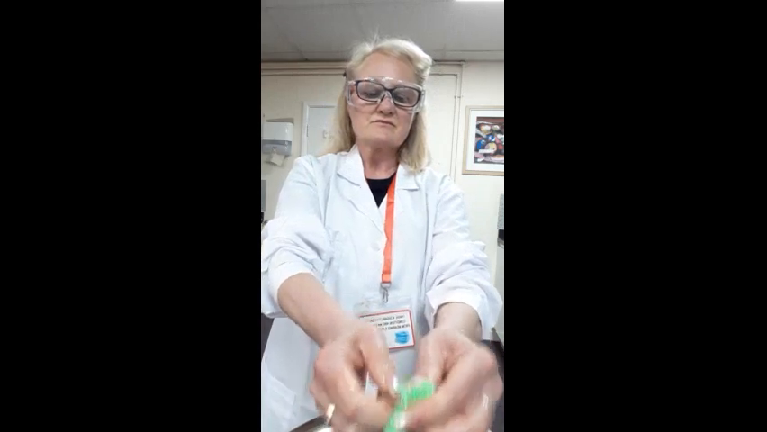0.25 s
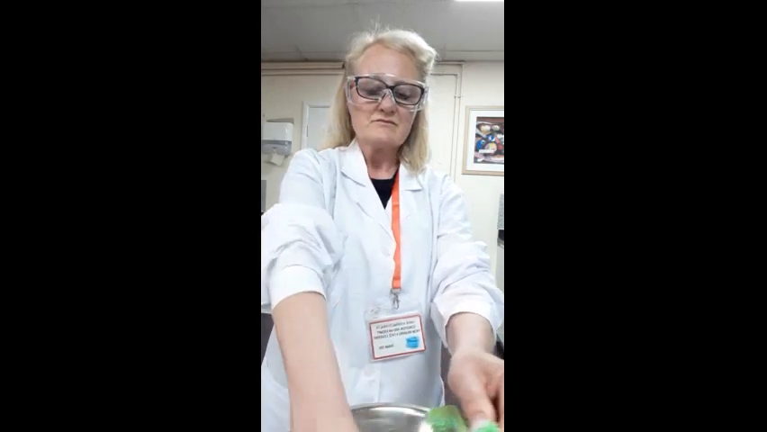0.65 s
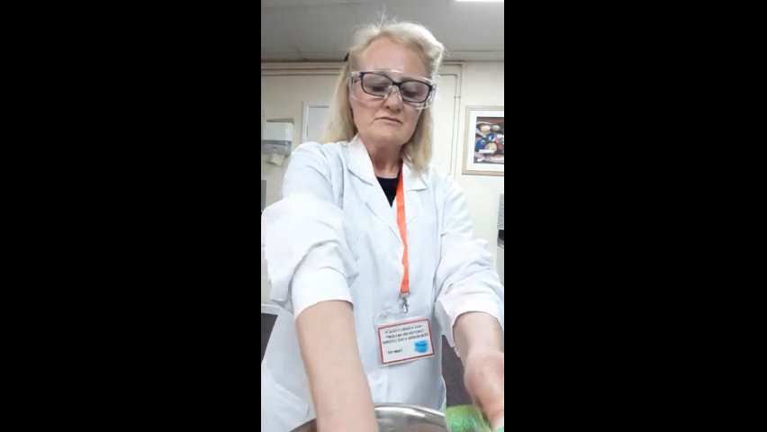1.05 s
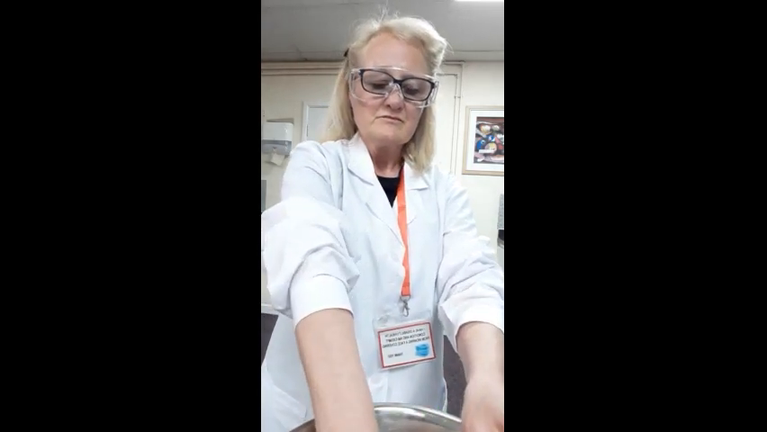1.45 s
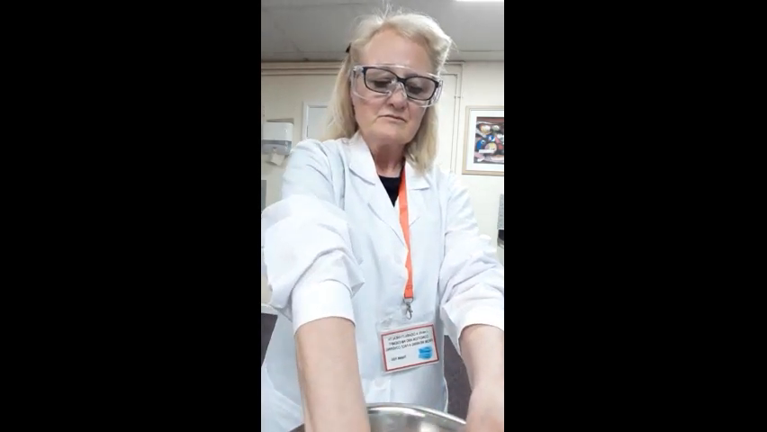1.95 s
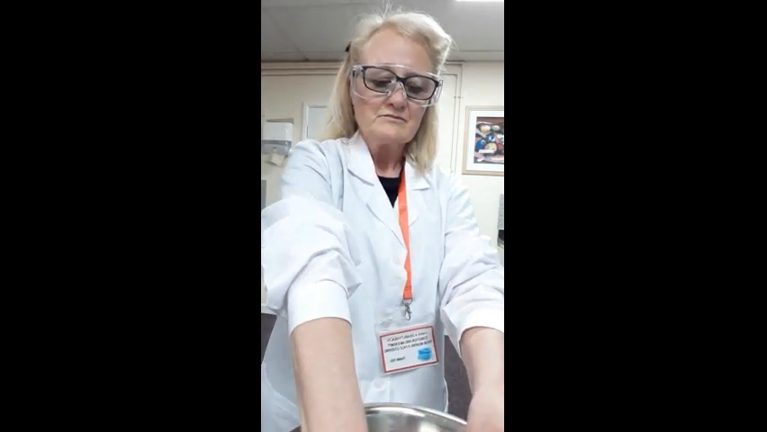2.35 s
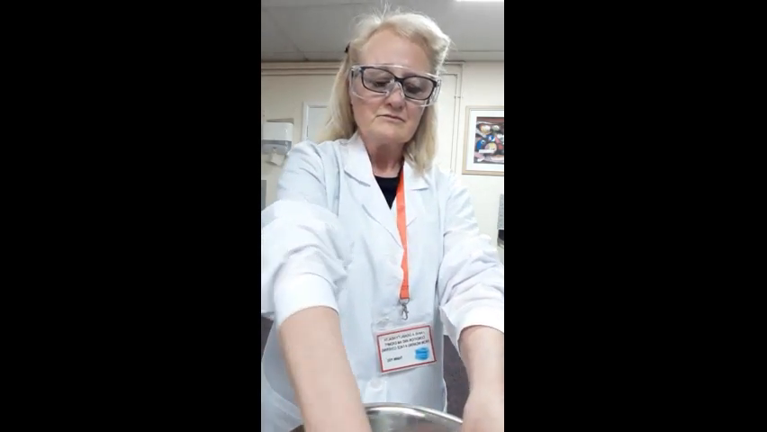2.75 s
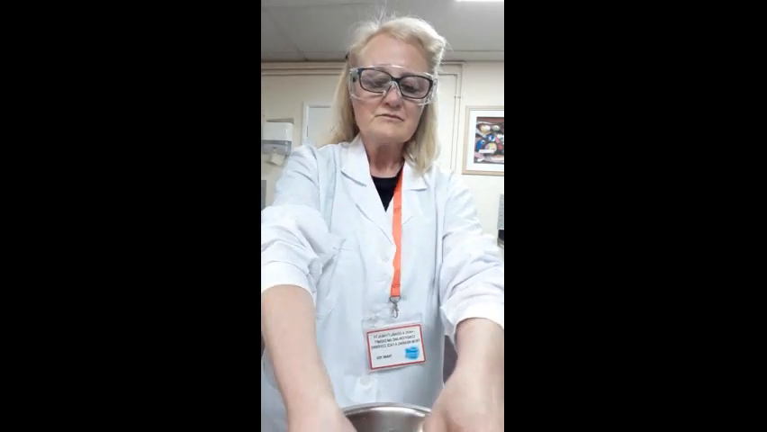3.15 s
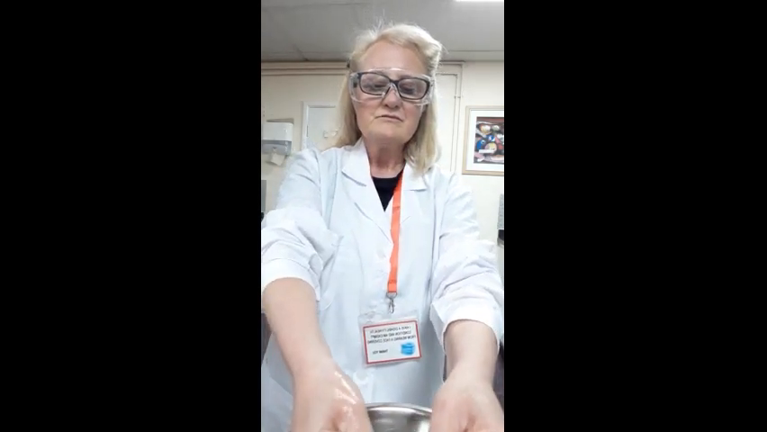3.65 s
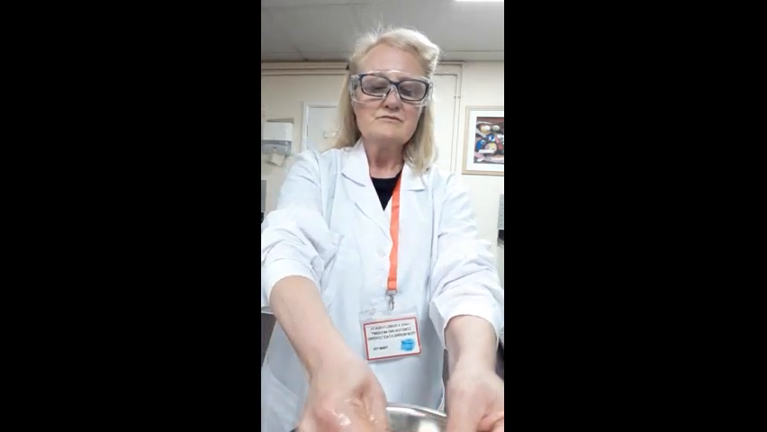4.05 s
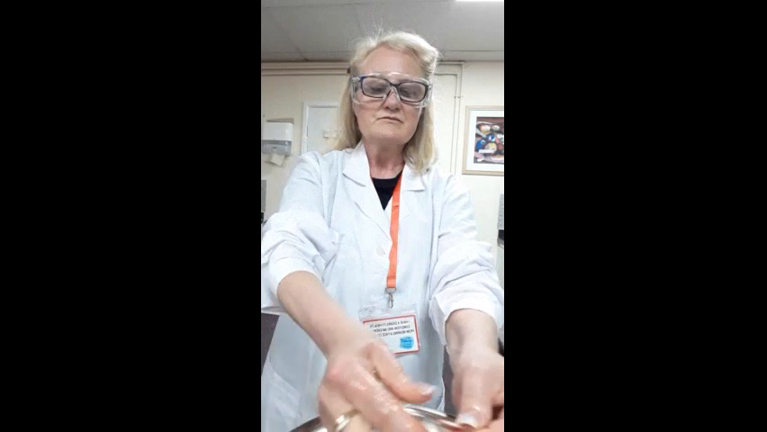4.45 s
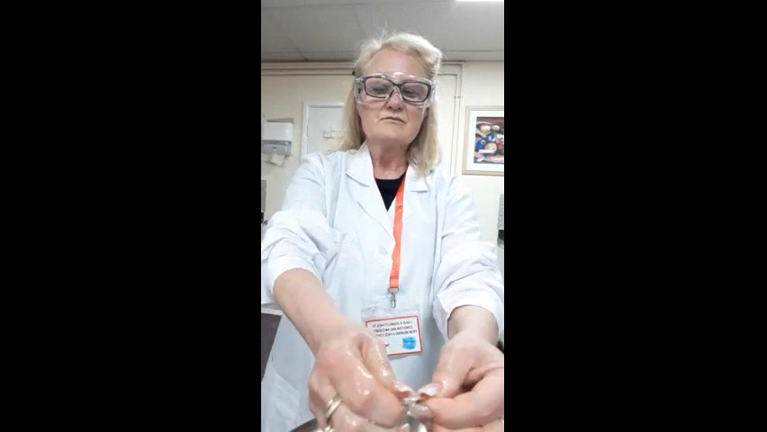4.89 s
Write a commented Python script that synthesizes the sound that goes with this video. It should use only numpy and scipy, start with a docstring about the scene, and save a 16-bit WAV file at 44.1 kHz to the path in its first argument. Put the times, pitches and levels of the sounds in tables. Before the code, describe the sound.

Wet pad scrubs a coin in faint hissing strokes, then metal clinks, squeaks and drips ring in a steel bowl that scrapes along the bench.

```python
"""Wet fingers scrub a coin with a scouring pad: a crackling hiss in short strokes, with bright soap snaps.
Then coin and rings clink in a steel bowl of water: noisy contacts ring its modes. The coin skids and squeaks
while the bowl rocks on its foot with low knocks; drips and clicks are damped tones. Next the bowl is dragged
over the bench in juddering shoves; more drips and snaps follow, then two faint shoves.
A quiet small room, steady noise with a fading hum, lies under it all, heard by a phone close by."""
import sys
import numpy as np
from scipy import signal
from scipy.fft import rfft, irfft
from scipy.io import wavfile
from scipy.ndimage import uniform_filter1d

SR = 44100
rng = np.random.default_rng(int(sys.argv[2]) if len(sys.argv) > 2 else 0)


def unload_audio(sound):
    """Save the sound as a 16-bit wav file, at the path given as the first command line argument."""
    columns = np.transpose(np.atleast_2d(sound))
    # keep every value between -1 and 1, then stretch to whole-number steps
    steps = np.round(np.clip(columns, -1, 1) * 32767)
    wavfile.write(sys.argv[1], SR, steps.astype(np.int16))


N = 225880
SPAN = 2 ** 15  # samples in one short sound
T = np.arange(SPAN) / SR  # seconds
HZ = np.arange(SPAN // 2 + 1) * SR / SPAN + 1e-3


def undb(db):
    """Decibels to gain."""
    return 10 ** (np.asarray(db) / 20)


def unit(x):
    """Scale to rms 1."""
    return x / np.sqrt(np.mean(x ** 2))


def causal(db):
    """Minimum-phase response for a gain in dB on the HZ grid, by folding the cepstrum."""
    cepstrum = irfft(db * np.log(10) / 20)
    cepstrum[1:SPAN // 2] *= 2
    cepstrum[SPAN // 2 + 1:] = 0
    return np.exp(rfft(cepstrum))


def shape(points):
    """dB on the HZ grid from (Hz, dB) points, straight over log frequency."""
    hz, db = np.transpose(points)[:2]
    return np.interp(np.log(HZ), np.log(hz), db)


def octaves_above(hz, most):
    """Octaves above hz on the HZ grid, from 0 up to most."""
    return np.clip(np.log2(HZ / hz), 0, most)


def octaves_below(hz, most):
    """Octaves below hz on the HZ grid, from 0 up to most."""
    return np.clip(np.log2(hz / HZ), 0, most)


def colour(x, db):
    """Filter a long signal."""
    return signal.oaconvolve(x, irfft(causal(db))[:SPAN // 8])[:N]


def resonate(x, modes):
    """Sum of narrow resonances (Hz, width Hz, dB), each at its own rms level."""
    total = 0
    for hz, width_hz, db in modes:
        b, a = signal.iirpeak(hz, hz / width_hz, SR)
        total = total + undb(db) * unit(signal.lfilter(b, a, x))
    return total


def curves(tables):
    """Gain from level tables at every sample, lightly smoothed; silent outside them."""
    t = np.arange(N) / SR
    gain = np.zeros(N)
    for rows in tables:
        s, db = np.transpose(rows)
        inside = (t >= s[0]) & (t <= s[-1])
        gain[inside] = undb(np.interp(t[inside], s, db))
    return uniform_filter1d(gain, size=200)


def add(out, s, sound, peak_db):
    """Mix one sound in at time s with the given peak."""
    i = int(s * SR)
    scaled = sound * undb(peak_db) / np.abs(sound).max()
    out[i:i + SPAN] += scaled[:N - i]


def burst(ms):
    """Spectrum of a rough contact: random signs that build up quickly and fade with time constant ms."""
    age = T * 1000 / max(ms, .05)
    noise = np.sign(rng.standard_normal(SPAN)) * np.exp(-age)
    rise = 1 - np.exp(-(T + 1 / SR) * 1000 / (0.22 * ms))
    return rfft(unit(noise * rise))


def slips(per_s, spread_db, smooth):
    """Stick-slip: random jerks of uneven size over a smooth rub."""
    chance = rng.random((3, N))
    size_db = spread_db * np.minimum(-np.log(1 - chance[2]), 4.0)
    jerks = (chance[0] < per_s / SR) * np.sign(chance[1] - .5) * undb(size_db)
    return unit(unit(jerks) + smooth * rng.standard_normal(N))


def flutter(per_s, depth_db):
    """Quick random wobble of pressure, as a gain."""
    k = int(SR / per_s)
    steps = np.repeat(rng.standard_normal(N // k + 1), k)[:N]
    return undb(depth_db * uniform_filter1d(steps, k))


# Modes of the steel bowl. Each row: frequency in Hz, relative level in dB, t60 in seconds.
BOWL_MODES = [(767, -19, 0.24), (1104, -13.5, 0.21), (1171, -18, 0.49), (1213, -19, 0.52),
              (1248, -22.5, 0.84), (1291, -16.5, .65), (1615, -14.5, 0.057), (1588, -9.5, 0.28),
              (1702, -7.5, 0.066), (1975, -8.5, 0.2), (2004, -12, 0.17), (2329, -6, 0.11),
              (2370, -17.5, 0.3), (2426, -16, 0.22), (2760, -8, 0.21), (2860, -18, .28), (3170, -25, 0.3),
              (3170, -22, 0.58), (3400, -18.5, 0.25), (3467, -8, 0.11), (4400, -30, 0.55),
              (4100, -14.5, 0.21), (4400, -21, 0.26), (5130, -26.5, 0.17), (5350, -27.5, .17),
              (5950, -25, 0.058), (6470, -9.5, 0.1), (6800, -5, 0.11), (7250, -15, 0.12)]


def bowl_rings(rows):
    """Spectra of decaying sines, a row for each mode; moving water makes each waver."""
    hz, db, t60_s = (column[:, None] for column in np.transpose(rows))
    line_width_hz = 3.4
    steps = rng.standard_normal((len(rows), SPAN))
    waver = np.cumsum(steps, axis=1) * np.sqrt(2 * np.pi * line_width_hz / SR)
    sines = np.sin(2 * np.pi * hz * T + waver)
    return rfft(undb(db) * sines * 1000. ** (-T / t60_s), axis=1)


# Crowd of close upper modes and the room. Each row: band centre in Hz, relative level in dB, t60 in seconds.
TAIL_BANDS = [(420, -13, 0.33), (816, -14, 0.18), (1520, -10.5, 0.067), (3100, -13.5, 0.21),
              (6340, -17.5, 0.15), (12000, -21, 0.067)]


def tails(count):
    """Spectra of noises in bands that die away, each band at its own rate."""
    noise = rfft(rng.standard_normal((count, SPAN)))
    total = 0
    for hz, db, t60_s in TAIL_BANDS:
        band = np.exp(-(np.log2(HZ / hz) / 0.67) ** 2)
        total = total + undb(db) * irfft(band * noise) * 1000. ** (-T / t60_s)
    return rfft(total)


def steel(modes, tail, ring_db, spot_db=3.5):
    """What rings on after a touch at a random spot of the bowl: its modes and the noisy tail."""
    levels = undb(spot_db * rng.standard_normal(len(modes)))
    spot = levels * np.exp(2j * np.pi * rng.random(len(modes)))
    slosh_bins = int(6.0 * rng.standard_normal())  # moving water detunes the steel by a few Hz
    return undb(ring_db) * np.roll(spot @ modes, slosh_bins) + tail


# Air noise spectrum. Each row: frequency in Hz, relative level in dB per Hz.
AIR_SPECTRUM = [(15, -48), (25, -16.5), (108, 1), (280, -19.5), (669, -24), (787, -26.5), (952, -32),
                (1090, -24), (1730, -25.5), (5880, -29.5), (6920, -30), (15200, -29), (16500, -38.5)]
AIR_DB = -66
# Faint far hum. One row: frequency in Hz, width in Hz, starting level in dB, seconds until its gain halves.
FAR_HUM = (341.5, 7.5, -79.5, 4.5)


def room():
    """Steady air noise and a narrow band of noise, the hum, that fades."""
    hz, width_hz, db, half_s = FAR_HUM
    hum = resonate(rng.standard_normal(N), [(hz, width_hz, db)])
    fade = 1 / (1 + (np.arange(N) / SR / half_s) ** 4)
    air = unit(colour(rng.standard_normal(N), shape(AIR_SPECTRUM)))
    return undb(AIR_DB) * air + fade * hum


# Drips, short clicks, a low thud and held tones. Each row: start in seconds, peak in dB,
# starting pitch in Hz, length in cycles.
DAMPED_TONES = [(.664, -50.5, 1906, 40), (.845, -38, 410, 22), (.865, -41, 600, 18),
                (1.060, -28.5, 2050, 0.93), (1.107, -46, 5000, 5.8), (1.128, -31.5, 1950, 1.15),
                (1.16, -47, 2860, 4.3), (1.800, -41.5, 620, 5), (1.806, -15, 5300, 0.46),
                (1.902, -31.5, 790, 5.7), (1.976, -21.5, 4200, 3.4), (2.017, -30.5, 2700, 3.3),
                (2.056, -38, 4800, 6.3), (2.113, -40, 1150, 0.93), (2.113, -33, 4150, 1.7),
                (2.128, -23.5, 1160, 3.8), (2.136, -26.5, 834, 2.1), (2.137, -21, 5900, 2.4),
                (2.165, -34.5, 1537, 18), (2.177, -24.5, 1270, 1.36), (2.189, -28.5, 1980, 5.6),
                (2.207, -34, 2360, 3.7), (2.254, -41, 1955, 4), (2.282, -27.5, 1464, 13),
                (2.284, -32, 3080, 17), (2.357, -29, 1180, 7.1), (2.371, -37, 5280, 2.2),
                (2.373, -32, 1205, 1.7), (2.379, -19, 4200, 2.7), (2.600, -31.5, 2220, 2.9),
                (2.747, -13, 2160, 2.3), (2.750, -15, 2760, 3.4), (2.751, -22.5, 1230, 7.3),
                (2.781, -29, 4500, 2.2), (3.184, -23.5, 3050, 12), (3.230, -29, 4370, 18),
                (3.395, -44, 2380, 48), (3.587, -34, 4030, 25), (3.659, -42, 3430, 8.4),
                (3.818, -46.5, 3390, 24), (3.857, -35, 3190, 17), (3.860, -46, 2330, 24),
                (3.888, -37, 2377, 11.3), (3.991, -52.5, 3490, 13), (3.993, -59, 2420, 15),
                (4.028, -38, 3020, 8.7), (4.078, -43.5, 3300, 21), (4.080, -56.5, 2020, 10),
                (4.143, -60.5, 2390, 15), (4.196, -42, 5150, 4.7), (4.197, -56.5, 2464, 9.9),
                (4.233, -39.5, 6800, 17)]
TONE_RING_DB, TONE_RING_PER_DB = -14.5, -.5  # at a peak of -36.5 dB; fainter ones carry more bowl and room


def drips_and_clicks(modes, tail):
    """Damped tones, each gliding slightly upward with a trembling level and stirring the bowl."""
    out = np.zeros(N)
    for k, (s, peak_db, hz, cycles) in enumerate(DAMPED_TONES):
        age = T * hz / cycles
        glide = np.sin(2 * np.pi * hz * T * (1 + 0.04 * np.minimum(age, 3)))
        tone = glide * np.exp(-age * 2.2) * (1 - np.exp(-age * 4.5))
        tremble = unit(uniform_filter1d(rng.standard_normal(SPAN), size=40))
        tone = tone * (1 + .4 * tremble)
        ring_db = TONE_RING_DB + TONE_RING_PER_DB * (peak_db + 36.5)
        ring = undb(ring_db) * steel(modes, tail[k % len(tail)], ring_db=-23.5)
        fade = undb(-150 * T)
        add(out, s, irfft(rfft(tone) * (1 + ring)) * fade, peak_db)
    return out


# Soap film and wet skin snapping. Each row: start in seconds, peak in dB, centre in Hz.
SNAP_EVENTS = [(0.0258, -25, 11400), (0.0546, -44, 7000), (0.2236, -31, 7220), (0.2458, -23, 5700),
               (0.266, -46, 6770), (0.3002, -23.5, 7300), (0.3444, -25, 11200), (0.4493, -38, 8560),
               (0.4787, -45, 7240), (0.634, -44.5, 12600), (0.6963, -42.5, 7680), (0.713, -40, 6520),
               (2.129, -30, 8330), (2.136, -28.5, 8430), (2.388, -37, 8400), (2.578, -40.5, 7460),
               (2.8015, -30, 6600), (3.2269, -31, 6650), (3.3892, -30.5, 8900), (3.5845, -44, 6400),
               (3.701, -49.5, 6700), (3.7763, -41.5, 8480), (3.8132, -29, 11630), (3.856, -37.5, 12700),
               (3.8861, -43.5, 12900), (4.018, -35, 12500), (4.0771, -45, 8170), (4.142, -36, 12820),
               (4.2334, -20.5, 11260), (4.4503, -39.5, 11440), (4.8497, -45, 12800), (4.8923, -45.5, 13100)]
SNAP_TAIL_DB = -10


def snaps(tail):
    """Soap snaps are bright ticks: a very short burst in one band, with a noisy tail."""
    out = np.zeros(N)
    for k, (s, peak_db, hz) in enumerate(SNAP_EVENTS):
        tick = causal(np.maximum(-16 * np.log2(HZ / hz) ** 2, -60))
        ring = 1 + undb(SNAP_TAIL_DB) * tail[k % len(tail)]
        add(out, s, irfft(burst(0.282) * tick * ring), peak_db)
    return out


# Modes of the full bowl on its foot. Each row: frequency in Hz, relative level in dB, t60 in seconds.
FOOT_MODES = [(124, -9, .25), (158.6, -16, 0.38), (201, -2, 0.96), (322.8, -6.5, 0.057), (444, -5, 0.16),
              (496, -9, 0.15), (500, -5, 0.05), (618, -10, 0.56), (735, 1, 0.29)]
# Rocks of the bowl. Each row: time in seconds, peak in dB, rise time of the push in ms.
ROCK_EVENTS = [(0.853, -41, 33), (0.899, -36, 2.8), (1.069, -46.5, 24), (1.288, -53.5, 13),
               (1.356, -52.5, 15.4), (1.471, -44, 8.9), (1.564, -25, 22), (1.672, -41, 13),
               (1.844, -27, 14), (1.927, -37.5, 8.2), (2.149, -48, 32), (2.219, -49.5, 12), (2.454, -29, 8)]
ROCK_KNOCK_DB, ROCK_RING_DB = -4, -43.5


def rocking():
    """The base swings ever faster as it settles; the swing and a dull knock ring the heavy low modes."""
    out = np.zeros(N)
    foot = bowl_rings(FOOT_MODES).sum(axis=0)
    swing_hz = 165 - 75 * np.exp(-T / 0.016)
    swing = np.sin(2 * np.pi * np.cumsum(swing_hz) / SR)
    soft = 1 / (1 + 1j * HZ / 500) ** 3 * (1j * HZ / (85 + 1j * HZ)) ** 3  # 85 to 500 Hz
    for s, peak_db, ms in ROCK_EVENTS:
        push = swing * (T * 1000 / ms) * np.exp(-T * 1000 / ms)
        knock = rng.standard_normal(SPAN) * np.exp(-T / 0.027)
        hit = rfft(push + undb(ROCK_KNOCK_DB) * knock)
        ring = 1 + undb(ROCK_RING_DB) * foot
        add(out, s - .008, irfft(hit * soft * ring), peak_db)  # starts 8 ms early
    return out


# Shoves of the bowl over the bench, a table for each. Each row: time in seconds, relative level in dB.
SHOVES = [
    [(2.705, -75.5), (2.728, -29.5), (2.742, -44), (2.785, -42)],
    [(2.785, -39), (2.808, -24.5), (2.884, -22.5), (2.96, -27.5), (3.08, -32.5), (3.1, -28), (3.304, -31.5),
     (3.366, -55), (3.405, -60)],
    [(3.405, -53.5), (3.442, -36), (3.568, -39), (3.64, -55.5), (3.75, -85)],
    [(4.43, -87.5), (4.486, -55), (4.54, -47), (4.605, -57.5), (4.645, -45.5), (4.75, -79.5)],
    [(4.75, -79.5), (4.805, -62.5), (4.82, -52.5), (4.9, -80.5)],
]
# Bench rumble spectrum. Each row: frequency in Hz, relative level in dB per Hz.
BENCH_SPECTRUM = [(41, -79.5), (70, -18.5), (162, 5), (328, 6), (517, 9.5), (566, 8.5), (779, 11.5),
                  (1610, -11), (2220, -21.5), (2720, -22), (3820, -30), (6020, -40.5), (16000, -90)]
# Bench top resonances. Each row: frequency in Hz, width in Hz, relative level in dB.
PLANK_MODES = [(255.2, 20, -24.5), (378, 13.5, -15.5), (512, 10, -27.5), (764, 42.7, -25),
               (931, 9.3, -15.5), (1300, 31, -21)]
# Singing rim resonances. Each row: frequency in Hz, width in Hz, relative level in dB.
RIM_MODES = [(2650, 25, -19.5), (6126, 530, -22), (13020, 200, -39)]
# The foot catches and lets go. Each row: start in seconds, peak in dB, fade time constant in ms.
CATCH_EVENTS = [(2.722, -26, 4.7), (2.811, -18.5, 12), (2.832, -18.5, 5.6), (2.862, -13, 6.5),
                (2.874, -17.5, 11), (2.911, -21, 7.3), (2.928, -10, 1.6), (3.032, -21, 21),
                (3.088, -14.5, 5.8), (3.1, -22, 14), (3.136, -11, 2.2), (3.219, -15.5, 7.2),
                (3.249, -19, 19), (3.51, -33.5, 2.6), (3.549, -31.5, 6.4), (4.616, -36.5, 6),
                (4.816, -42, 3.2)]
BRIGHT_DB, BRIGHT_PER_DB, DULLEST_DB = 9.5, .9, -23  # treble gain at a -30 dB shove; harder is brighter
LIGHT_DB, BASS_PER_DB = -44.5, 5  # a shove that peaks under this level loses bass
CATCH_DULL_PER_DB = 0.37  # treble loss in dB per octave for each dB of peak under -19.5


def dragging(tail):
    """The foot judders over the bench: a grainy rumble, a few hard catches, a singing rim."""
    gain = np.abs(curves(SHOVES))  # abs guards the powers below from rounding under zero
    tilt_db = np.maximum(BRIGHT_DB + BRIGHT_PER_DB * (20 * np.log10(gain + 1e-9) + 30), DULLEST_DB)
    jerks = slips(2000, 3.0, 0.71) * flutter(45, 3.2)
    bench = shape(BENCH_SPECTRUM)
    low = colour(jerks, bench - 12 * octaves_above(900, most=3))
    high = colour(jerks, bench - 12 * octaves_below(1600, most=3))
    scale = np.std(low + high)

    flat = []  # the peak level of each shove, held over its whole length
    for rows in SHOVES:
        top_db = max(db for _, db in rows)
        flat.append([(rows[0][0], top_db), (rows[-1][0], top_db)])
    weight = np.abs(curves(flat))
    bass = np.minimum(weight / undb(LIGHT_DB), 1) ** BASS_PER_DB

    full = low / scale + resonate(jerks, PLANK_MODES)
    thin = colour(full, -18 * octaves_below(480, most=1.5))
    out = gain * (bass * full + (1 - bass) * thin + undb(tilt_db) * high / scale)
    rim_gain = bass * weight ** 0.64 * gain ** 0.56  # light shoves hardly make the rim sing
    out = out + rim_gain * resonate(jerks, RIM_MODES)

    catch = causal(bench + 2.0 * np.log2(HZ / 1000)) * (1 + undb(-17.5) * tail[0])
    for s, peak_db, ms in CATCH_EVENTS:
        slope_db = CATCH_DULL_PER_DB * min(peak_db + 19.5, 0)
        dull = causal(slope_db * octaves_above(1000, most=3))
        add(out, s, irfft(burst(ms) * catch * dull), peak_db)
    return out


# Strokes of the pad on the coin. Each row: start of the hold in seconds, held seconds, level in dB.
STROKES = [(0.017, 0.0096, -46), (.095, 0.058, -57), (0.228, 0.035, -42), (.298, 0.0056, -52.5),
           (0.336, .04, -48.5), (.598, 0.0073, -65.5)]
# Pad spectrum. Each row: frequency in Hz, relative level in dB per Hz.
PAD_SPECTRUM = [(410, -61), (700, -25), (1500, -16), (1920, 1.5), (3110, 0), (6920, 0.5), (9730, -5),
                (11200, 1), (16000, -6.5)]
SCRUB_RISE_DB_S, SCRUB_FALL_DB_S = 507, 257.5


def scrubbing():
    """Wet fibres catch on the coin's relief: dense crackle in a hiss; each stroke rises, holds and fades."""
    t = np.arange(N) / SR
    gain = np.zeros(N)
    for s, held_s, db in STROKES:
        rise_db = SCRUB_RISE_DB_S * np.maximum(s - t, 0)
        fall_db = SCRUB_FALL_DB_S * np.maximum(t - s - held_s, 0)
        gain += undb(db - rise_db - fall_db)
    crackle = unit(colour(slips(1800, 6.6, 0.9), shape(PAD_SPECTRUM)))
    return gain * flutter(62.2, 3.4) * crackle


# Coin and rings strike the bowl. Each row: start in seconds, peak in dB, fullness near 1 kHz in dB,
# contact fade time constant in ms.
CLINK_EVENTS = [(0.7302, -21, -39.5, 3.2), (0.8026, -29.5, -19.5, 2.1), (0.8395, -10.5, -5.5, 1.17),
                (0.8614, -8.5, -13.5, 1.8), (0.8674, -14, -14, 2.7), (0.8894, -20, -21, 1.5),
                (1.6716, -14.5, -7, 2.16), (1.8153, -20, -12, 4.3), (1.8547, -7.5, -14.5, 1),
                (1.927, -18, -9.5, 1.85), (2.3251, -22, -11, 3.3), (2.4349, -6.5, -15, 3.1),
                (2.614, -28, -12, 1.2)]
THUD_DB, CLINK_RING_DB = -22.5, -19.5  # 450 Hz relative to the fullness; share of the modes
TREBLE_DB, TREBLE_PER_DB = 4, 0.61  # contact level at 9 kHz; a harder blow is brighter


def clinks(modes, tail):
    """A hard tick of the edge and a rough contact that rings the steel, each clink with its own colour."""
    out = np.zeros(N)
    for k, (s, peak_db, low_db, ms) in enumerate(CLINK_EVENTS):
        thud_db = low_db + THUD_DB
        high_db = TREBLE_DB + TREBLE_PER_DB * peak_db
        contact = shape([(150, thud_db - 16), (450, thud_db), (1000, low_db), (2000, -0.9), (4500, -5),
                         (9000, high_db), (15000, high_db - 8.0)])
        tick = undb(-3.0) * burst(0.12)
        ring = burst(ms) * (1.5 + steel(modes, tail[k % len(tail)], CLINK_RING_DB))
        add(out, s, irfft(causal(contact) * (tick + ring)), peak_db)
    return out


# The coin's edge squeaks along the steel. Each row: start in seconds, peak in dB, length in ms, centre in Hz.
SQUEAK_EVENTS = [(1.004, -27, 34, 2250), (1.44, -46.5, 46, 2400), (1.466, -40.5, 23, 2200),
                 (1.529, -34, 34, 2120), (1.550, -30.5, 15, 1530), (1.565, -37, 19, 720),
                 (1.62, -53, 25, 1290)]


def squeaks(modes, tail):
    """A short swell of noise, narrowed around one pitch, that rings the bowl."""
    out = np.zeros(N)
    for s, peak_db, ms, hz in SQUEAK_EVENTS:
        swell = np.sin(np.pi * np.minimum(T * 1000 / ms, 1))
        stroke = rng.standard_normal(SPAN) * swell
        pitch = causal(np.maximum(-14 * np.log2(HZ / hz) ** 2, -50))
        ring = undb(14) + steel(modes, tail[2], ring_db=-11.5)
        add(out, s, irfft(rfft(stroke) * pitch * ring), peak_db)
    return out


# Coin skidding over the steel, a table for each skid. Each row: time in seconds, relative level in dB.
SKID_LEVELS = [
    [(0.84, -52), (0.93, -46.5), (1.0, -47), (1.15, -56.5), (1.32, -69)],
    [(1.4, -71.5), (1.48, -50.5), (1.7, -48.5), (2.07, -52.5), (2.36, -55), (2.72, -73)],
]
SKID_TREBLE_DB = -11.5


def skid(modes, tail):
    """Stick-slip of the coin: its body rings the steel modes, its treble only stirs the dense upper ones."""
    rub = curves(SKID_LEVELS) * flutter(40, 2.4) * slips(530, 4.9, 0.93)
    body = colour(rub, shape([(400, -10), (1200, 1.0), (4000, -7.5), (7000, -5.5), (15000, -41)]))
    treble = shape([(2500, -49.5), (6000, 6.0), (10000, 8.0), (15000, 4.5)])
    hiss = colour(rub * undb(SKID_TREBLE_DB), treble)
    ring = irfft(1 + steel(modes, undb(-1.5) * tail[0], ring_db=-18))
    wash = irfft(1 + undb(1.0) * tail[1])
    both = signal.oaconvolve(body, ring) + signal.oaconvolve(hiss, wash)
    return undb(-12) * both[:N]


# Stereo side treble. Each row: frequency in Hz, gain in dB.
SIDE_TREBLE = [(3000, -92.5), (5000, -47), (7000, -36), (12000, -16.5)]
# Stereo side noise. Each row: frequency in Hz, relative level in dB per Hz.
SIDE_NOISE = [(15, -40.5), (25, -2), (87, 1.5), (368, -9.5), (6380, -8.5), (7510, -5.5), (8830, -43.5),
              (16500, -46.5)]
SIDE_NOISE_DB = -82


def stereo_side(near):
    """Scattered treble and a faint noise, to be added with opposite sign in left and right."""
    scatter = rng.standard_normal(SPAN) * np.exp(-T / .002)
    scatter = scatter[:SPAN // 16] / np.linalg.norm(scatter)
    treble = signal.oaconvolve(colour(near, shape(SIDE_TREBLE)), scatter)[:N]
    noise = unit(colour(rng.standard_normal(N), shape(SIDE_NOISE)))
    return treble + undb(SIDE_NOISE_DB) * noise


def scene():
    """All sources sit in the centre; left and right differ only by some high treble and a faint noise."""
    modes, tail = bowl_rings(BOWL_MODES), tails(count=6)
    near = drips_and_clicks(modes, tail) + snaps(tail) + rocking() + dragging(tail) + scrubbing()
    near = near + clinks(modes, tail) + squeaks(modes, tail) + skid(modes, tail)
    side = stereo_side(near)
    return near + room() + np.array([side, -side])


TOP_HZ = 15900


def record(dry):
    """The phone drops the deepest bass and cuts the top."""
    bass_cut = signal.butter(2, 60, "high", fs=SR, output="sos")
    top_cut = signal.ellip(10, .2, 70, TOP_HZ, fs=SR, output="sos")
    return signal.sosfilt(top_cut, signal.sosfilt(bass_cut, dry))


dry = scene()
out = record(dry)
unload_audio(out)
```